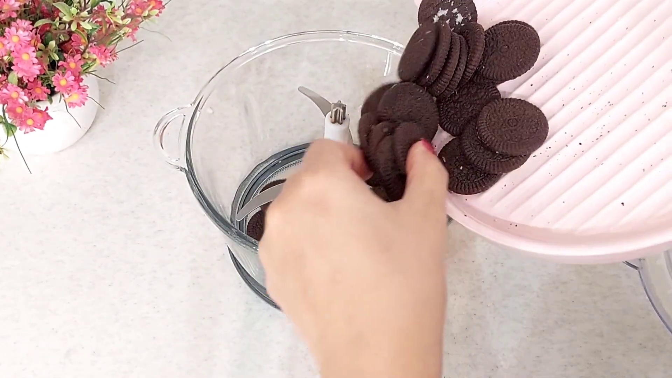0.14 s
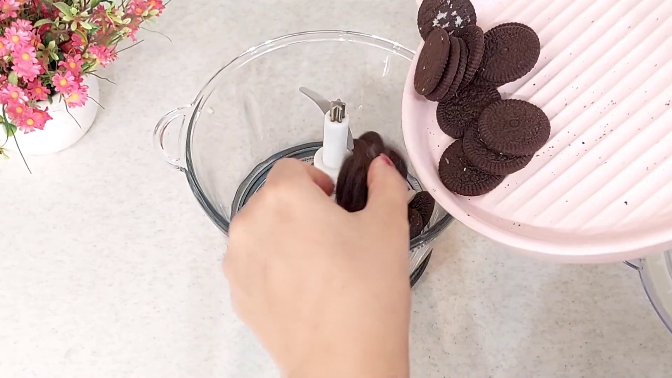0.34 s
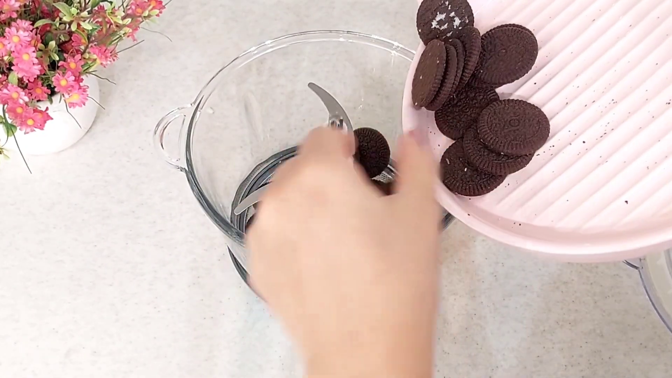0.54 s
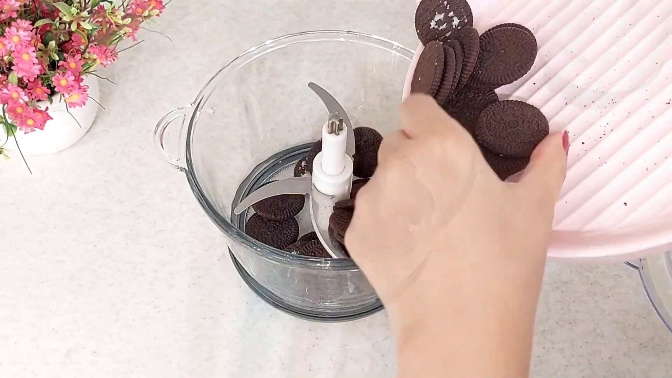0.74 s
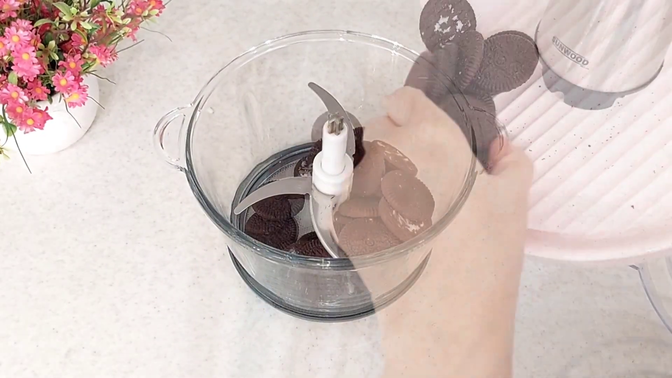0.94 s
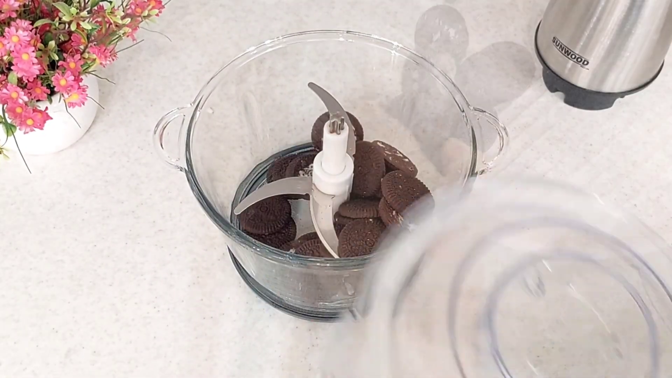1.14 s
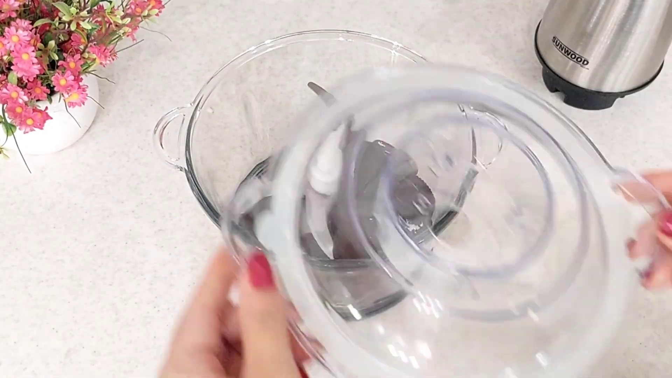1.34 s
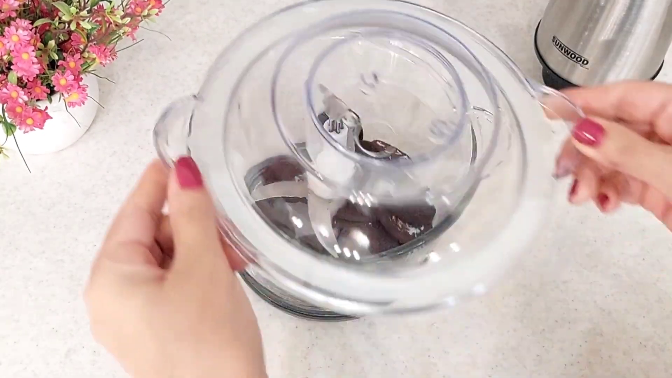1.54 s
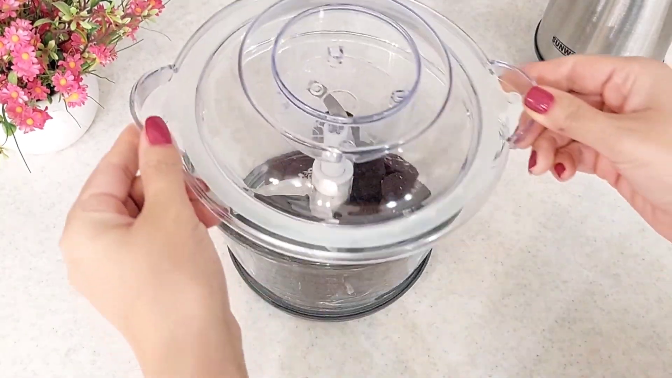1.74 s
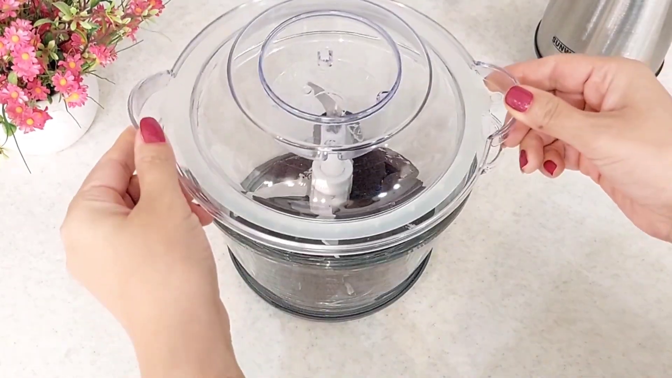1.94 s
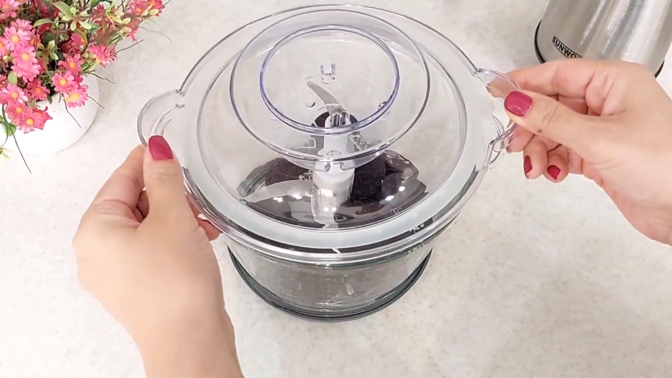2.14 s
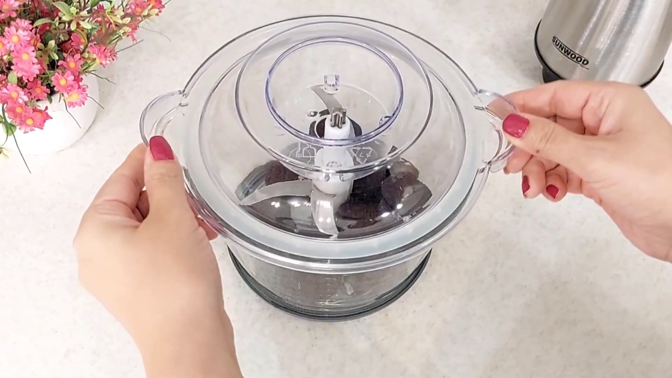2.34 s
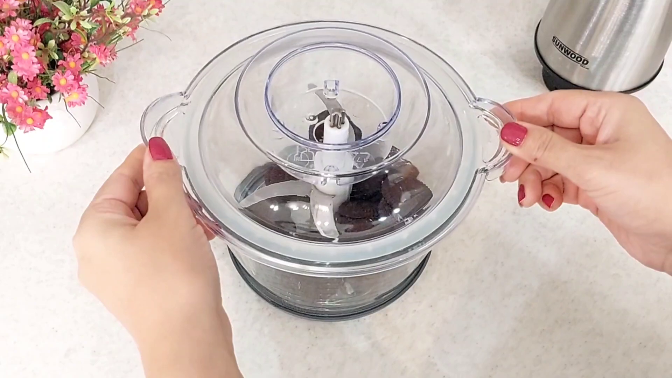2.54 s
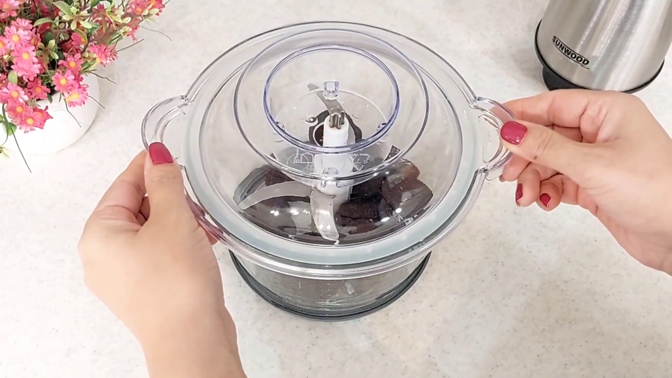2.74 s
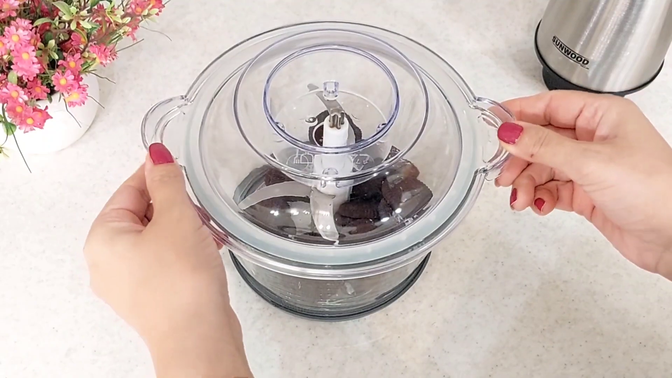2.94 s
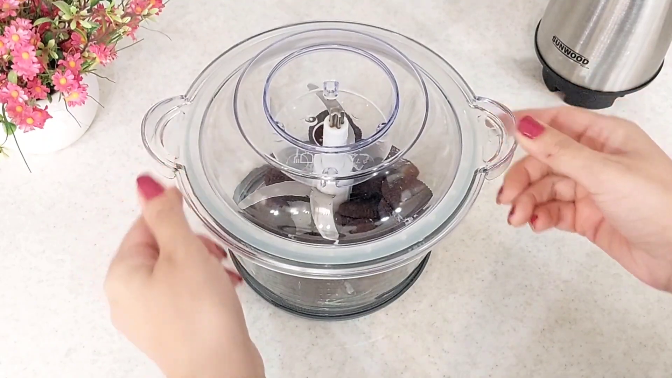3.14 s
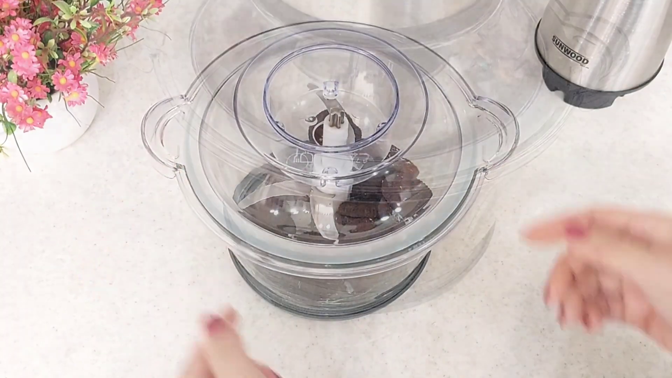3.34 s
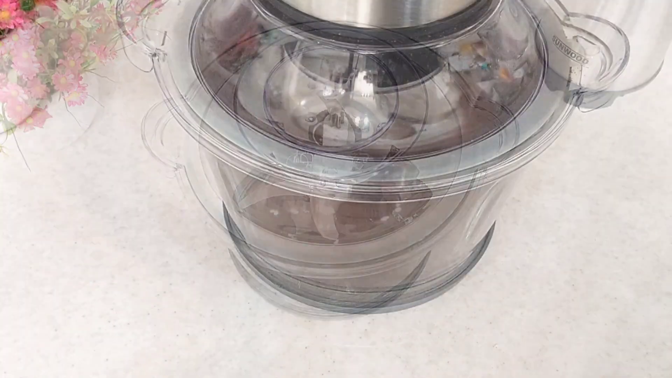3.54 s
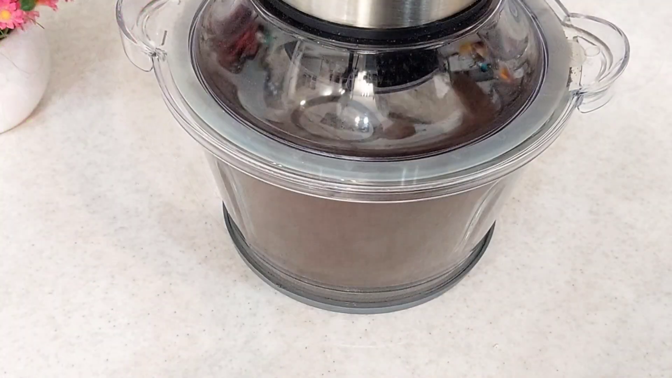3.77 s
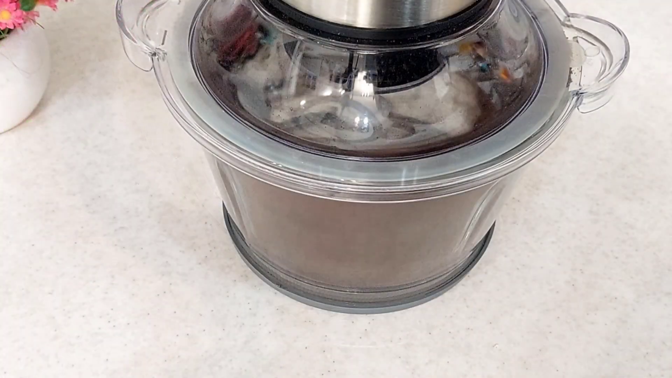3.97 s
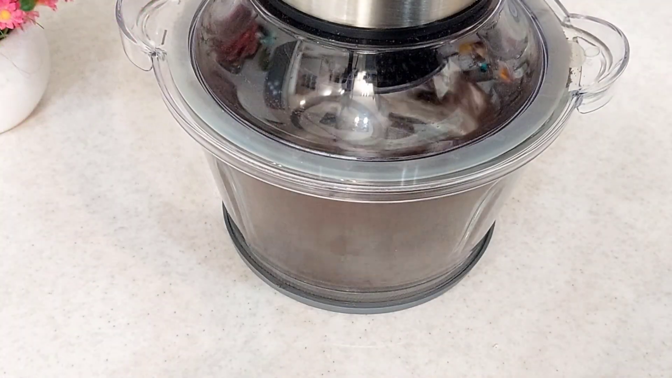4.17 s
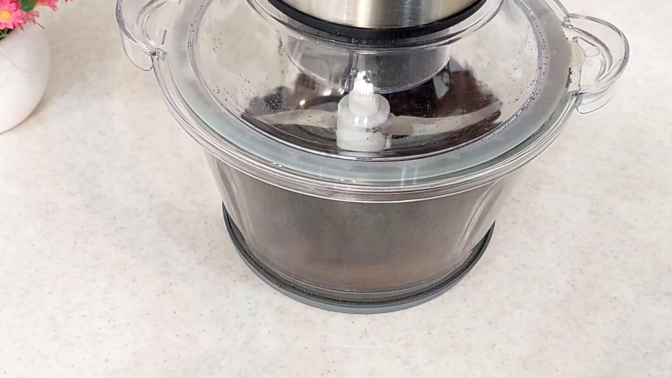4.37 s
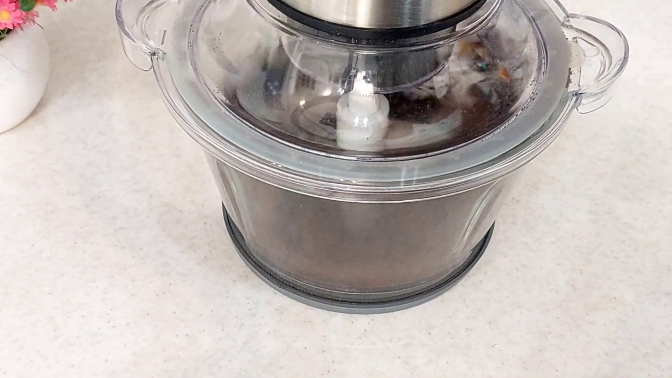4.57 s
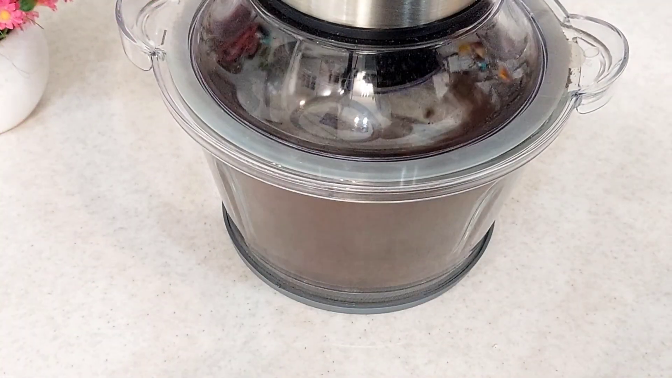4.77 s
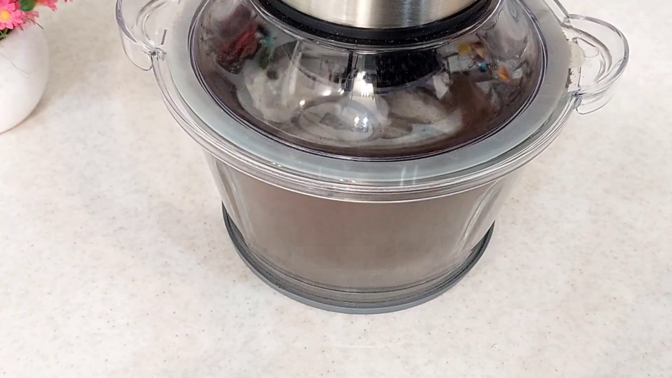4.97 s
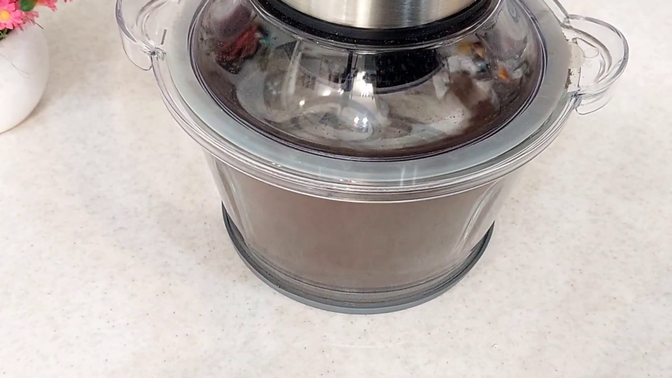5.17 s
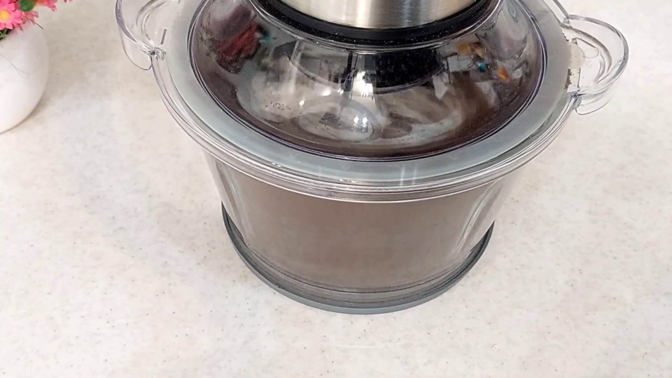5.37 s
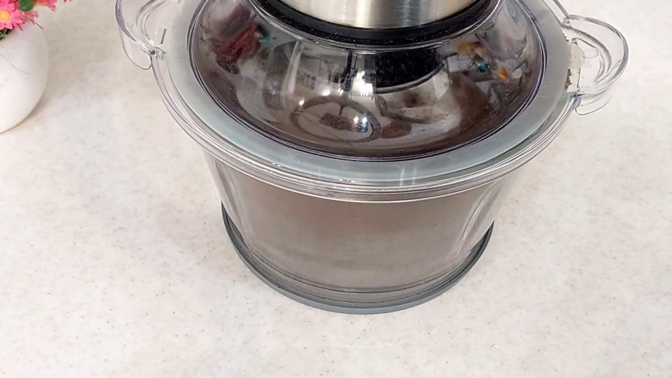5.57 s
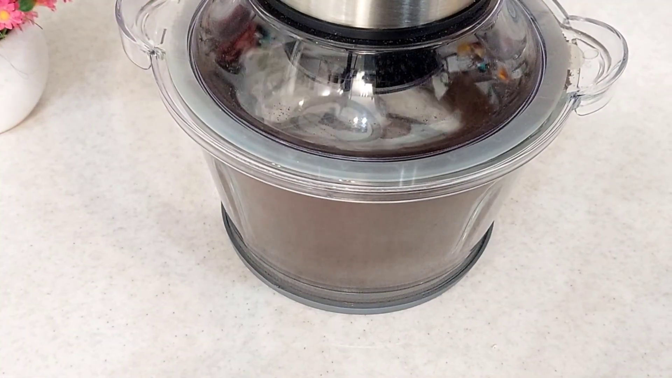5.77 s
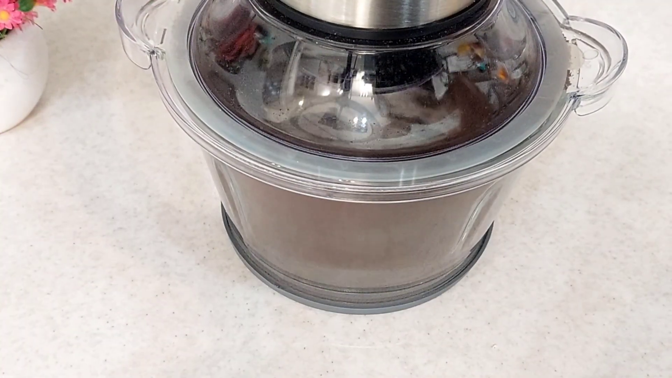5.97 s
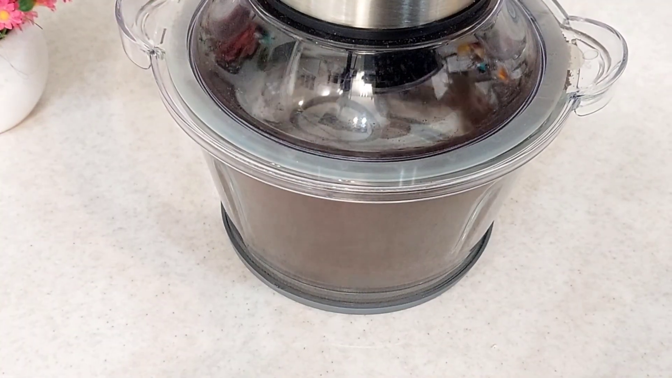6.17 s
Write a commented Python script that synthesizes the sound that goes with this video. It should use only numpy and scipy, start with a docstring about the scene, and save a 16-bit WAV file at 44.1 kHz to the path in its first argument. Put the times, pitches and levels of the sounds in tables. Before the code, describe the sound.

Close by in a small kitchen, dry biscuits slide and tumble into a glass bowl, thinning to a few light ticks. A plastic lid rocks into place with a quick cluster of taps. After a quiet moment a mini chopper starts grinding, stops briefly, then runs again for longer: low churning, pieces pelting and cracking, glass and steel ringing lightly. Faint room noise and electrical hum lie under the stereo sound.

```python
"""Biscuits slide from a hand and clatter into the glass bowl of a mini chopper, exciting its modes.
The plastic lid rocks onto the rim, rubs and is pressed down; the bowl thuds on its rubber foot.
The chopper runs in two bursts: the blade churns the load, chunks and dust pelt the wall, large
pieces crack, and glass and steel ring under the impacts. All is heard from close by, in stereo,
in a small reverberant kitchen with faint room noise and mains hum."""
import sys
import numpy as np
from scipy import signal
from scipy.fft import rfft, irfft
from scipy.io import wavfile

SR = 44100
rng = np.random.default_rng(int(sys.argv[2]) if len(sys.argv) > 2 else 0)


def generate_wav(signal):
    """Clip the signal to [-1, 1] and save it as 16-bit WAV at the path in sys.argv[1]."""
    frames = np.transpose(np.atleast_2d(signal))
    scaled = np.clip(frames, -1, 1) * 32767
    pcm = np.round(scaled).astype(np.int16)
    wavfile.write(sys.argv[1], SR, pcm)


N = 273861
TIME = np.arange(N) / SR

# modes of the glass bowl: (frequency [Hz], level [dB], t60 [s], left-right difference [dB])
BOWL_MODES = [(815, -4, .06, 0), (1130, -5, .04, 5), (1395, -2, .05, 2), (1650, -3, .08, 0),
              (1727, -1, .24, 1), (2117, -3, .06, -3), (2320, -7, .08, 0), (2890, -6, .12, 1),
              (3060, -5, .08, 2), (3622, -5, .07, 5), (3900, -7, .07, -2), (4390, -3, .07, 4),
              (4714, -4, .06, 6), (5320, -1, .04, 4)]
# modes of the lid: (frequency [Hz], level struck at one side [dB], at the other [dB], t60 [s])
LID_MODES = [(300, -18, -13, .1), (400, -8, -14, .06), (490, -7, -14, .07), (910, -12, -16, .05),
             (1370, -22, 0, .065), (1900, -3, -8, .06), (1945, -2, -7, .09), (2020, -4, -13, .06),
             (2290, -9, -18, .05), (3300, 0, -14, .055), (3440, -1, -16, .06), (7924, -22, -28, .07)]
# runs of the motor: (switch on [s], switch off [s])
BURSTS = [(3.24, 4.1645), (4.578, 6.3)]
# likeness of the sound at left and right: (frequency [Hz], coherence [0-1])
COHERENCE = [(60, 0.92), (330, .97), (550, 0.46), (900, 0.32), (1400, 0.45), (2200, 0.11), (16000, 0.16)]
SPIN_UP_S = 0.083  # time to full blade speed


def amp(db):
    """Decibels to amplitude ratio."""
    return 10 ** (np.asarray(db) / 20)


def unit(x):
    """Normalisation to rms 1."""
    return x / np.sqrt(np.mean(x ** 2) + 1e-20)


def read(points, hz):
    """Interpolation on a log-frequency axis."""
    f, value = np.transpose(points)
    return np.interp(np.log(hz + 1), np.log(f + 1), value)


def pan(db):
    """Direction by level difference: left and right gains."""
    return amp([[db / 2], [-db / 2]])


def off_centre(x, lag_s=.000113):
    """Direction by time difference: sound from the right reaches the left channel later."""
    return np.array([np.pad(x[0], (round(lag_s * SR), 0))[:N], x[1]])


def add(mix, s, sound):
    """Superposition of a stereo sound on the mix at time s."""
    part = mix[:, max(round(s * SR), 0):][:, :sound.shape[1]]
    part += sound[:, :part.shape[1]]


def colour(x, spectrum, size=4096):
    """Minimum-phase filtering by (frequency [Hz], gain [dB]) points keeps attacks sharp."""
    log_gain = np.log(amp(read(spectrum, abs(np.fft.fftfreq(size, 1 / SR)))))
    taps = np.fft.ifft(np.exp(np.conj(signal.hilbert(log_gain)))).real
    return signal.oaconvolve(x, taps[None], axes=1)[:, :x.shape[1]]


def cohere(x):
    """Spatial coherence: two independent signals are mixed so that long waves reach both sides alike."""
    left, right = rfft(x)
    alike = np.clip(read(COHERENCE, np.fft.rfftfreq(x.shape[1], 1 / SR)), 0, 1)
    mid = (left + right) * np.sqrt(1 + alike)
    side = (left - right) * np.sqrt(1 - alike)
    return irfft(np.array([mid + side, mid - side]) / 2, x.shape[1])


def hail(per_s, spread_db):
    """Shot noise: random impacts of many sizes."""
    size = amp(spread_db * np.minimum(rng.exponential(1, (2, N)), 4))
    return cohere(size * rng.choice([-1, 1], (2, N)) * (rng.random((2, N)) < per_s / SR))


def wander(lo_hz, hi_hz, count=40):
    """Random modulation of rms 1: a sum of slow sines in random phase."""
    t = np.linspace(0, N / SR, N // 64)
    waves = sum(np.sin(2 * np.pi * (f * t + rng.random())) for f in np.geomspace(lo_hz, hi_hz, count))
    return np.interp(TIME, t, unit(waves))


def swell(s, width_s):
    """Gaussian envelope of height 1 around time s."""
    return np.exp(-((TIME - s) / width_s) ** 2)


def stroke(s, length, db, attack_s=0.0065, t60=0.25):
    """Envelope of a slide or rub: linear attack, hold, exponential decay."""
    release_db = 60 * np.maximum(TIME - s - length, 0) / t60
    return np.clip((TIME - s) / attack_s, 0, 1) * amp(db - release_db)


def chime(modes, t):
    """Free vibration: damped modes (frequency [Hz], level [dB], t60 [s]), phased apart left and right."""
    out = np.zeros((2, len(t)))
    for hz, db, t60 in modes:
        phase = rng.uniform(-np.pi, np.pi, (2, 1)) * (1 - np.clip(read(COHERENCE, hz), 0, 1))
        out += amp(db - 60 * t / t60) * np.sin(2 * np.pi * hz * t + phase)
    return out


def sing(modes, load_hz):
    """Forced vibration: tiny impacts drive the modes, and a load's damping widens each by load_hz."""
    out = np.zeros((2, N))
    for hz, db, t60, side_db in modes:
        pole = np.exp((2j * np.pi * hz - np.log(1000) / t60 - np.pi * load_hz) / SR)
        response = signal.lfilter([1], [1, -pole], hail(per_s=1200, spread_db=2.5)).real
        out += amp(db) * pan(side_db) * unit(response)
    return unit(out)


def background():
    """Ambient noise: a drifting broadband floor with the steady partials of mains hum."""
    # room noise: (frequency [Hz], spectral level [dB])
    air_spectrum = [(15, -46.5), (25, -9), (82, -1), (149, -4), (195, -0.5), (249, -8.5), (373, -1.5),
                    (887, -23), (1890, -25), (3160, -34.5), (16000, -42)]
    # mains hum: (frequency [Hz], level [dB])
    hum_partials = [(100, -69), (199.2, -71)]
    # level of both over time, lower after 3.2 s and lower still by 4.4 s: (time [s], gain [dB])
    floor_level = [(1.0, -2), (1.9, -2), (2.85, 0.5), (3.2, -3), (4.4, -10)]
    flutter_db = 0.7 * wander(lo_hz=2, hi_hz=15)
    air = unit(colour(cohere(rng.standard_normal((2, N))), air_spectrum)) * amp(-62 + flutter_db)
    hum = sum(amp(db) * np.sqrt(2) * np.sin(2 * np.pi * hz * TIME) for hz, db in hum_partials)
    return (air + hum) * amp(np.interp(TIME, *np.transpose(floor_level)))


def biscuits():
    """Stick-slip friction and impact: biscuits slide over each other in jerks and land in the bowl."""
    # biscuits sliding: (start [s], length [s], level [dB], share of coarse clicks [0-1])
    slides = [(0, .22, -54, .6), (.48, .06, -48, .6), (.60, .09, -58, .7), (.85, .19, -68, .05),
              (1.15, .09, -63, .8), (1.38, .04, -62, .2)]
    # biscuits landing: (time [s], level [dB], treble [dB], clink frequency [Hz])
    drops = [(0.028, -30.5, -20, 1810), (0.131, -29, -25, 3880), (0.193, -30.5, -27, 5020),
             (0.271, -24, -24, 3180), (0.29, -25, -21, 2820), (0.324, -26.5, -6, 5260),
             (0.335, -18, -15.5, 5450), (0.357, -21.5, -26.5, 2100), (0.363, -21.5, -20, 3830),
             (0.394, -25.5, -12, 1430), (0.425, -22.5, -15, 2300), (0.434, -20.5, -20.5, 6190),
             (0.441, -20.5, -16.5, 3870), (0.451, -18, -18, 3454), (0.487, -22.5, -18, 4180),
             (0.596, -31, -38, 1840), (0.692, -29.5, -51, 2400), (1.02, -39, -26, 1640),
             (1.115, -39, -8, 5500), (1.131, -28.5, -19, 2280), (1.214, -34.5, -20, 3760),
             (1.28, -42, -18, 2930), (1.325, -45.5, -19, 1500), (1.37, -41, -19, 2290)]
    # biscuit contact noise: (frequency [Hz], spectral level [dB])
    spectrum = [(130, -32), (220, -7), (326, -3.5), (420, -2), (1050, -13.5), (1450, -8), (2000, -7.5),
                (3950, -13), (4480, -13), (5260, -9.5), (9010, -26), (10400, -18), (16000, -25)]
    smooth = unit(colour(hail(per_s=7000, spread_db=-2.0), spectrum))
    catching = unit(colour(hail(per_s=350, spread_db=1.0), spectrum))
    glass = amp(-6) * sing(BOWL_MODES, load_hz=6)
    jerks_db = 4.5 * wander(lo_hz=14, hi_hz=70)
    scrape = np.zeros((2, N))
    for s, length, db, coarse in slides:
        grain = np.sqrt(1 - coarse) * smooth + np.sqrt(coarse) * catching
        jerks = unit(amp(np.sqrt(coarse) * jerks_db))
        scrape += (grain * jerks + glass) * stroke(s, length, db)
    scrape = colour(scrape, [(5500, 0.0014), (8500, -2)])  # sliding is duller than striking
    clatter = snaps(drops, spectrum, rattle_s=0.06, ring_db=-12.5, clink_db=2.5, snap_db=-4.5,
                    usual_treble_db=-18.5, body_share=.15)
    return scrape + amp(-11.5) * clatter


def snaps(rows, spectrum, rattle_s, ring_db, clink_db, snap_db, usual_treble_db, body_share):
    """Impulse excitation: a brittle contact snaps and rattles, the piece clinks and the bowl rings."""
    out, t = np.zeros((2, N)), np.arange(SR // 3) / SR
    bands_hz = np.geomspace(700, 16000, 30)
    for s, db, treble_db, clink_hz in rows:
        # a clean break is brighter, thinner and more sudden than a crumbling one
        high_db = treble_db - usual_treble_db
        tilt = [(400, -body_share * high_db), (900, 0.014), (5000, 0.0086), (9000, high_db)]
        decay = amp(-60 * t / rattle_s) + amp(snap_db + 0.7 * high_db) * np.exp(-t / 0.00092)
        grit = rng.standard_normal((2, len(t))) * (rng.random(len(t)) < .25)
        hit = colour(colour(cohere(grit) * decay, spectrum), tilt)
        # every piece has its own size and so its own broad resonances
        hit = colour(hit, np.c_[bands_hz, rng.normal(0, 3.5, len(bands_hz))])
        hit /= np.sqrt(np.mean(hit[:, :SR // 200] ** 2))
        # each spot on the glass favours other modes
        ring = chime([(hz, mode_db + rng.normal(0, 4), t60) for hz, mode_db, t60, _ in BOWL_MODES], t)
        clink = chime([(clink_hz * rng.uniform(.94, 1.06), 0, .025), (clink_hz, 0, .035)], t)
        scatter = pan(7 * rng.uniform(-1, 1))
        add(out, s, amp(db) * scatter * (hit + amp(ring_db) * ring + amp(clink_db) * clink))
    return out


def counter():
    """Resonance: the bowl bumps on its rubber foot and the counter swells into a low note."""
    # bumps from hand, motor or load: (time [s], foot level [dB], wall level [dB])
    thuds = [(.03, -45.5, -48), (0.359, -39, -42.5), (.458, -31.5, -38.5), (.50, -33, -41),
             (.69, -51, -48.5), (1.594, -57, -51.5), (1.636, -51, -54.5), (2.536, -51, -57),
             (2.687, -40, -56), (3.257, -57.5, -41.5), (4.597, -46, -33), (5.272, -25.5, -33),
             (5.567, -45, -26)]
    # the bowl bouncing on its foot: (frequency [Hz], level [dB], t60 [s])
    foot_modes = [(105.2, 0.5, 0.17), (121, -0.5, 0.12)]
    # hollow notes of its wall: (frequency [Hz], level [dB], t60 [s])
    wall_modes = [(235, -7.5, 0.099), (295, 0.5, 0.12), (332, -2.5, .09)]
    out, t = np.zeros((2, N)), np.arange(SR // 2) / SR
    for s, foot_db, wall_db in thuds:
        foot = amp(foot_db) * chime(foot_modes, t) * (1 - np.exp(-t / 0.017))
        wall = amp(wall_db) * chime(wall_modes, t) * (1 - np.exp(-t / 0.008))
        add(out, s, amp(6.5) * (foot + wall))
    return out


def lid():
    """Modal excitation: as the lid rocks onto the rim, the point of contact decides which modes ring."""
    # lid meeting rim: (time [s], level [dB], place [0-1], left-right difference [dB], tick level [dB])
    taps = [(1.990, -30.5, 0, 1, -7), (2.003, -31.5, 0, -2.5, -13.5), (2.041, -32.5, 0.87, 1.5, -11),
            (2.220, -41, 0, -2, -16), (2.258, -52, 0.63, 2, -3), (2.57, -65, 0.57, -3.5, -6),
            (2.687, -72.5, 0.5, 2, 7)]
    tick_spectrum = [(100, 4), (400, 8.5), (750, -1), (2100, -1), (3400, 0.5), (8000, -8.5),
                     (10000, -19), (15000, -17)]
    out, t = np.zeros((2, N)), np.arange(SR // 3) / SR
    hardest_db = max(row[1] for row in taps)
    for s, db, place, side_db, tick_db in taps:
        # a gentle contact lasts longer and so spares the high modes
        contact_s = 0.002 + 0.00023 * (hardest_db - db)
        db_per_octave = 3.1 * (hardest_db - db)
        modes = []
        for hz, near_db, far_db, t60 in LID_MODES:
            dull_db = db_per_octave * max(np.log2(hz / 2000), -.15)
            modes.append((hz, near_db + place * (far_db - near_db) - dull_db, t60))
        tick = colour(cohere(rng.standard_normal((2, len(t)))) * amp(-60 * t / 0.17), tick_spectrum)
        ring = amp(1.0) * chime(modes, t) * (1 - np.exp(-t / contact_s))
        add(out, s, amp(db) * pan(side_db) * (ring + amp(tick_db) * tick))
    return out


def rubbing():
    """Friction drives the lid's lower modes faintly as it is turned into place."""
    # the lid dragging on the rim: (start [s], length [s], level [dB])
    rubs = [(2.57, 0.09, -76), (3.04, .08, -77)]
    low_modes = [(hz, db, t60, 0) for hz, db, _, t60 in LID_MODES if hz < 3000]
    return sing(low_modes, load_hz=15) * sum(stroke(*rub) for rub in rubs)


def motor(coast_s=0.091):
    """Inertia: blade speed (0-1) ramps up at switch-on and decays exponentially after switch-off."""
    return sum(np.clip((TIME - on) / SPIN_UP_S, 0, 1) * np.exp(-np.maximum(TIME - off, 0) / coast_s)
               for on, off in BURSTS)


def drive(speed, power, whole_db, powder_db_per_s, fling_db, lull_db):
    """Power law: a chopping noise's gain follows speed, shifting as biscuits become crumbs and powder."""
    grind_s = 0.59  # running time from whole biscuits to crumbs
    run_s = np.cumsum(speed) / SR
    grain_db = whole_db * np.maximum(1 - run_s / grind_s, 0)
    grain_db += powder_db_per_s * np.maximum(run_s - grind_s, 0)
    # on reaching speed the blade flings the settled load, then runs lighter while it is in the air
    start_db = sum(fling_db * swell(on + SPIN_UP_S, 0.02) + lull_db * swell(on + 0.2, 0.098)
                   for on, _ in BURSTS)
    return speed ** power * amp(grain_db + start_db)


def chopper():
    """Granular impact noise: the ringing blade churns the load and flings clumps of it at the wall."""
    # the load tumbling in the bowl: (frequency [Hz], spectral level [dB])
    churn_spectrum = [(20, -44), (45, -21), (68, -16), (84, -5), (106, 0), (128, -.5), (195, -8), (250, -4),
                      (297, 2), (335, -1), (380, -7), (470, -8), (600, -16), (1500, -80)]
    # chunks striking the wall: (frequency [Hz], spectral level [dB])
    chunk_spectrum = [(290, -19.5), (500, -3.5), (813, 1), (971, -4), (1110, 1.5), (1740, -1.5),
                      (3410, -7.5), (4990, -5), (5610, -5.5), (7920, -3.5), (8500, -30.5), (11000, -39),
                      (18700, -120)]
    # dust striking the wall: (frequency [Hz], spectral level [dB])
    dust_spectrum = [(4880, -36), (8300, -18), (8820, -10.5), (10900, -4.5), (12100, -0.5), (13500, -10),
                     (15200, -7), (16000, -18)]
    # modes of the steel blade: (frequency [Hz], level [dB], t60 [s], left-right difference [dB])
    blade_modes = [(5612, -1, .08, -13), (5748, 1, .07, 0), (6430, -2, .024, -6), (6595, 0, .035, 7),
                   (6911, -8, .05, 0), (7170, -3.5, .032, 0), (7690, -2.5, .03, -13)]
    # lumps collapsing onto the blade: (time [s], gain [dB])
    collapses = [(4.837, 5), (5.57, 5)]
    speed = motor()
    lumps = amp(sum(db * swell(s, width_s=0.01) for s, db in collapses))
    clumps = wander(lo_hz=8, hi_hz=159, count=90)

    churn = unit(colour(hail(per_s=900, spread_db=1.5), churn_spectrum)) * lumps
    churn *= drive(speed, power=1.48, whole_db=-7.5, powder_db_per_s=0.25, fling_db=3, lull_db=-3)

    chunks = unit(colour(hail(per_s=2500, spread_db=3.6), chunk_spectrum))
    glass = sing(BOWL_MODES, load_hz=26)
    free_db = 4 * (1 - speed)  # as the load drops off the wall, the glass rings more freely
    wall = (amp(0.3 - free_db) * chunks + amp(free_db - 2) * glass) * amp(1.39 * clumps) * lumps
    wall *= drive(speed, power=1.87, whole_db=-6.5, powder_db_per_s=0, fling_db=6.5, lull_db=-1.5)

    blade = sing(blade_modes, load_hz=2) * amp(2.27 * wander(lo_hz=4.5, hi_hz=39.82))
    blade *= drive(speed, power=2.07, whole_db=-7, powder_db_per_s=-0.3, fling_db=-6, lull_db=-4.5)

    dust = unit(colour(hail(per_s=8700, spread_db=0.5), dust_spectrum))
    dust *= amp(1.6 * clumps + wander(lo_hz=6.3, hi_hz=58.9))
    late_speed = np.interp(TIME - 0.013, TIME, speed)  # dust hangs in the air: it starts and stops late
    dust *= drive(late_speed, power=1.8, whole_db=-6.5, powder_db_per_s=1.2, fling_db=10, lull_db=-0.5)
    return amp(-32.5) * (churn + wall) + amp(-32) * blade + amp(-40.5) * pan(4.3) * dust


def cracks():
    """Impact and brittle fracture: the switch clicks, and large pieces shatter on the blade."""
    # clicks and fractures: (time [s], level [dB], treble [dB], clink frequency [Hz])
    events = [(3.242, -49, -27, 1440), (3.282, -30, -26, 1400), (3.3, -23.5, -21.5, 3560),
              (3.467, -20.5, -23, 1680), (3.771, -24.5, -7, 5460), (4.108, -19, 4, 5390),
              (4.168, -22, -22, 6100), (4.582, -44.5, -17, 2110), (4.602, -30.5, -30, 1430),
              (4.638, -18.5, -22, 1435), (4.827, -16.5, -25, 1670), (5.148, -19, -13, 5640),
              (5.551, -14, -20.5, 5500), (6.119, -19, -2, 1800)]
    spectrum = [(80, -32), (300, 8.5), (700, 9.5), (1600, 4), (2600, -4), (4500, -1), (6500, 3),
                (8800, -12), (12000, 2.5), (15500, -9.5)]
    return amp(-9.5) * snaps(events, spectrum, rattle_s=.042, ring_db=-14, clink_db=-6, snap_db=-12,
                             usual_treble_db=-21, body_share=.8)


def kitchen(x, size=24000):
    """Reverberation: dense reflections from near walls, each band decaying at its own rate."""
    # reverberation time: (frequency [Hz], t60 [s])
    decay_times = [(100, 0.72), (300, 0.35), (800, 0.41), (2000, 0.16), (6000, 0.14), (14000, 0.15)]
    reflections = rng.standard_normal((2, size)) * (rng.random((2, size)) < 1 / 16)
    reflections[:, :round(.005 * SR)] = 0  # gap before the first reflection
    hz, t, bands = signal.stft(cohere(reflections), SR, nperseg=256)
    tail = signal.istft(bands * amp(-60 * t / read(decay_times, hz)[:, None]), SR)[1]
    return signal.fftconvolve(x, tail / np.linalg.norm(tail[0]), axes=1)[:, :N]


def scene():
    """Superposition of direct sound, the kitchen's reverberation and ambient noise."""
    knocks = biscuits() + lid() + rubbing() + off_centre(cracks())
    machine = off_centre(chopper())
    direct = counter() + knocks + machine
    reverberation = amp(-6.5) * kitchen(knocks) + amp(-17) * kitchen(machine)
    return direct + reverberation + background()


def record(dry, cutoff_hz=15720):
    """Band limiting: a linear-phase low-pass filter removes the highest treble."""
    low_pass = signal.firwin(601, cutoff_hz, window=("kaiser", 8), fs=SR)
    return signal.oaconvolve(dry, low_pass[None], "same", axes=1)


dry = scene()
out = record(dry)
generate_wav(out)
```